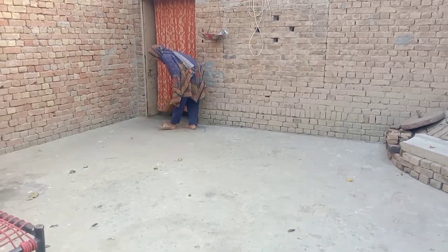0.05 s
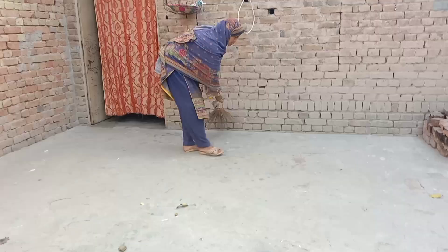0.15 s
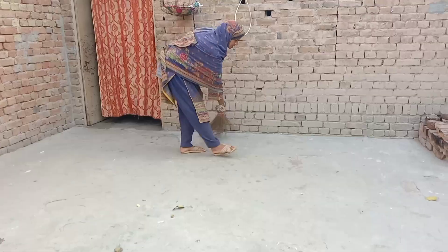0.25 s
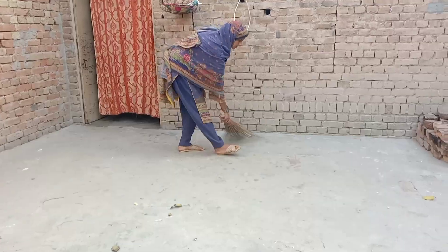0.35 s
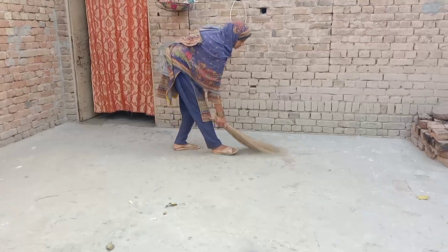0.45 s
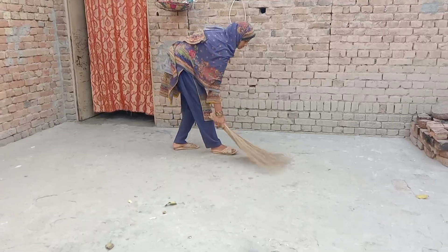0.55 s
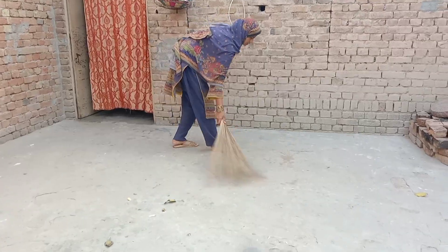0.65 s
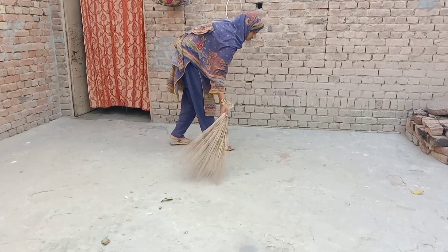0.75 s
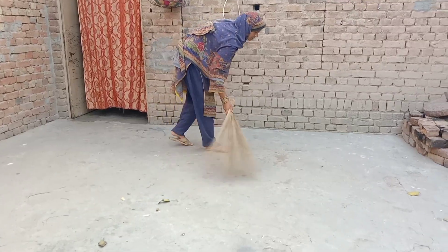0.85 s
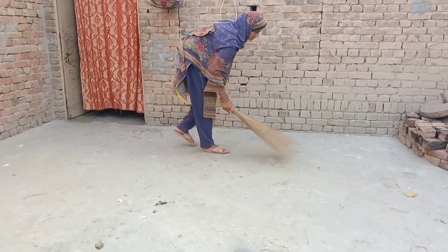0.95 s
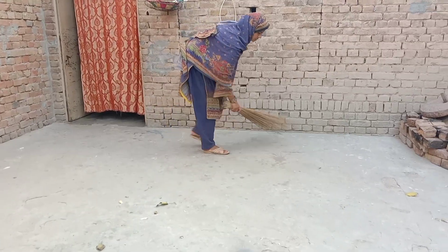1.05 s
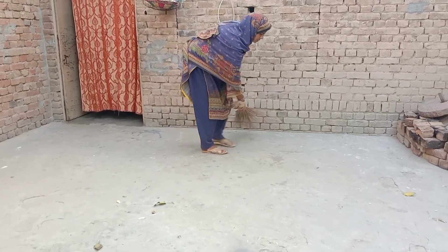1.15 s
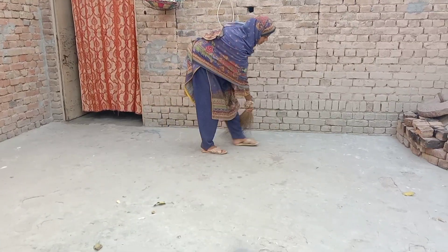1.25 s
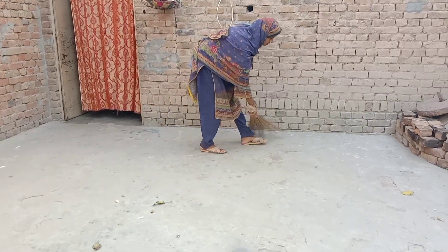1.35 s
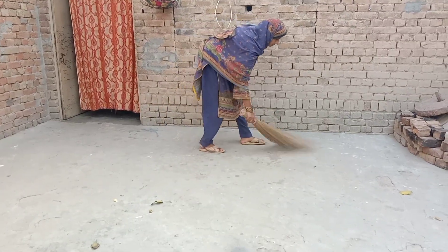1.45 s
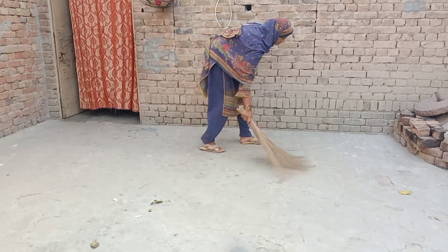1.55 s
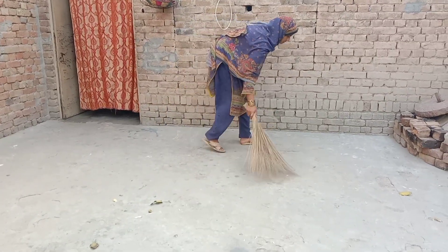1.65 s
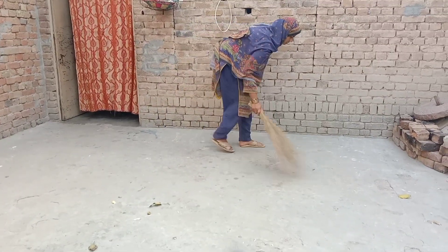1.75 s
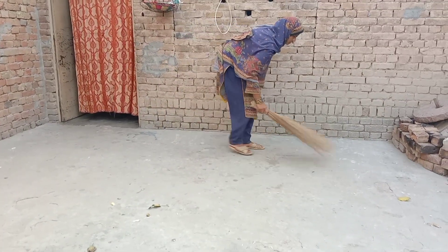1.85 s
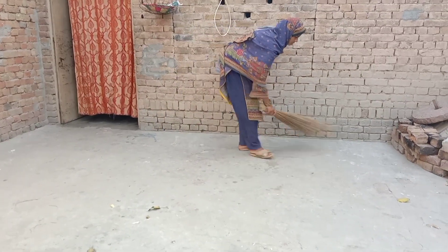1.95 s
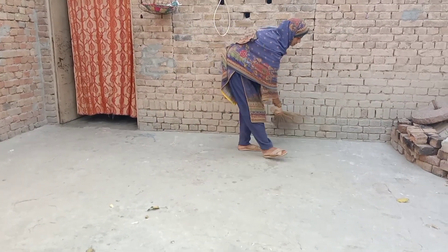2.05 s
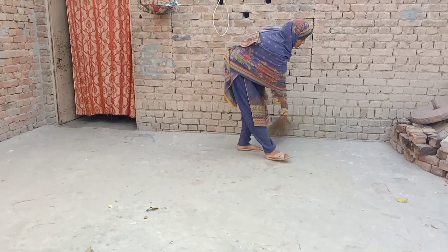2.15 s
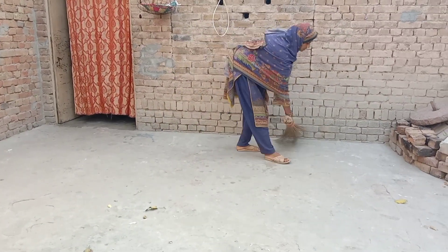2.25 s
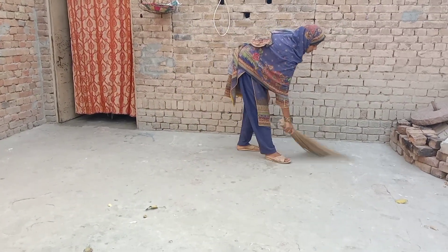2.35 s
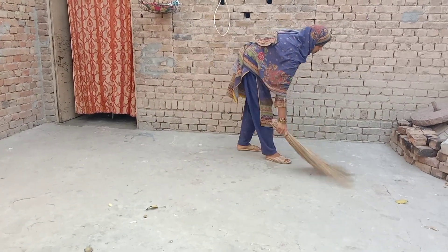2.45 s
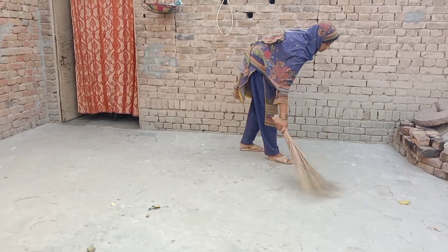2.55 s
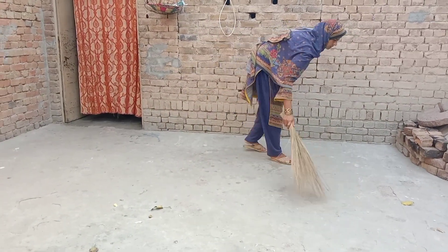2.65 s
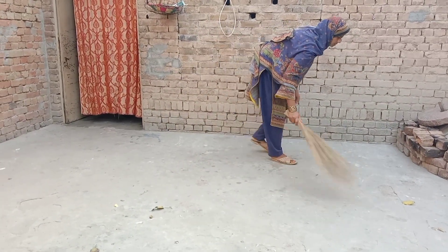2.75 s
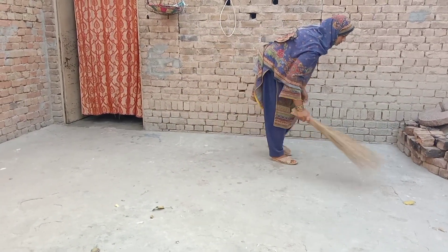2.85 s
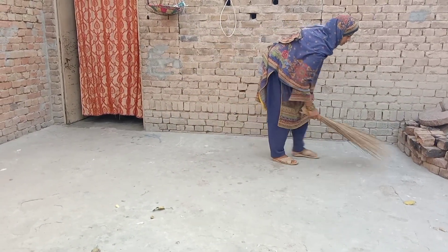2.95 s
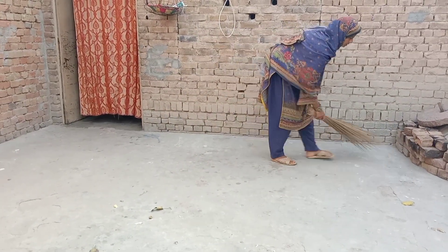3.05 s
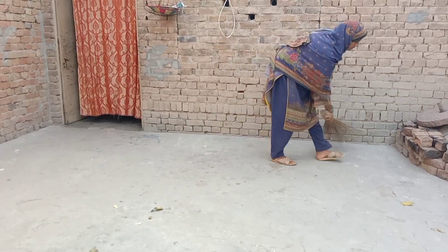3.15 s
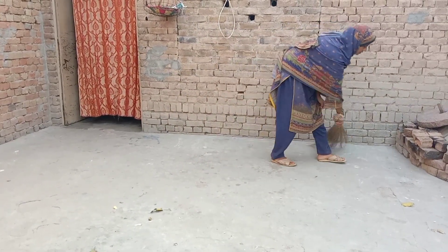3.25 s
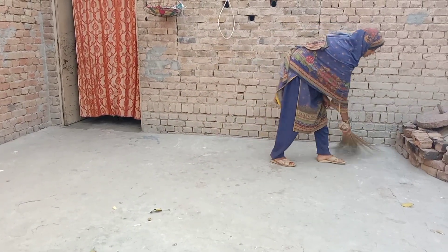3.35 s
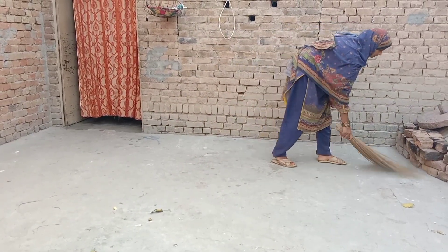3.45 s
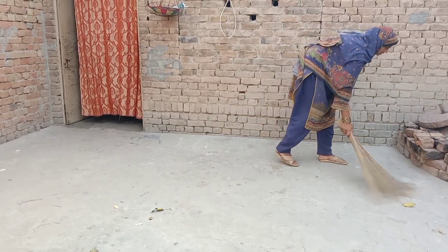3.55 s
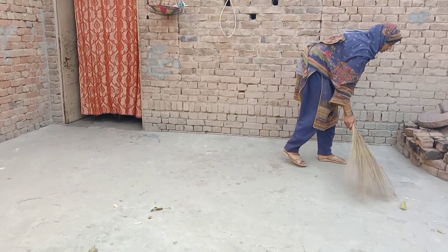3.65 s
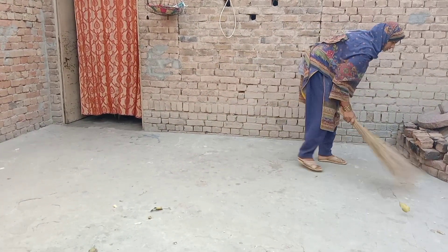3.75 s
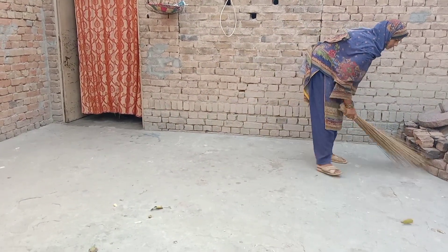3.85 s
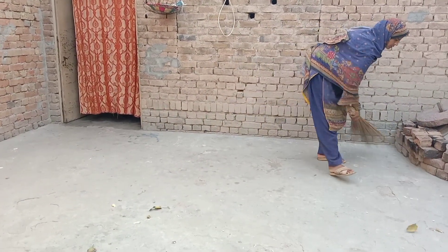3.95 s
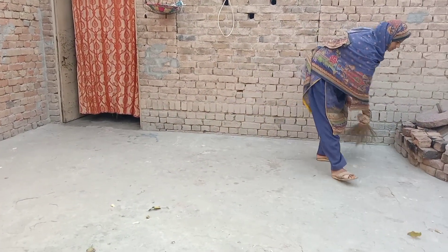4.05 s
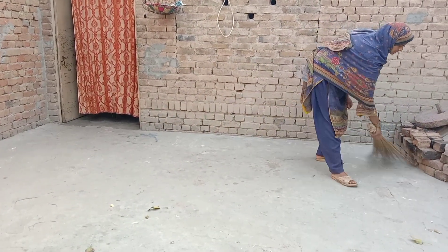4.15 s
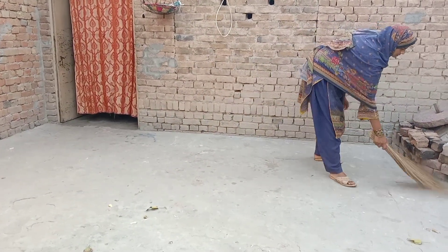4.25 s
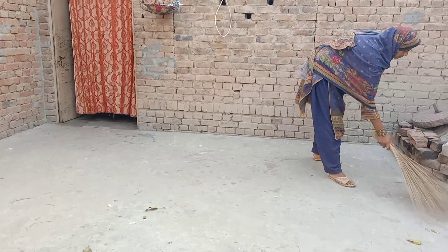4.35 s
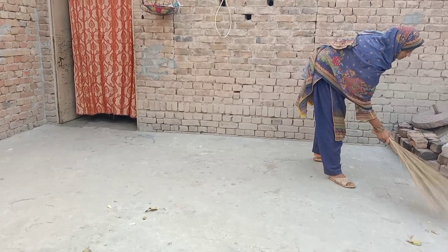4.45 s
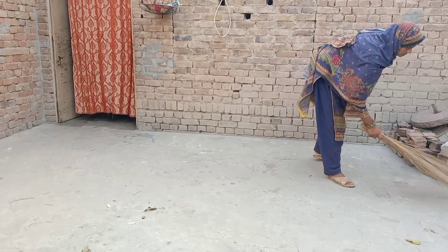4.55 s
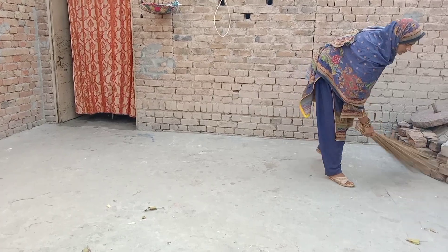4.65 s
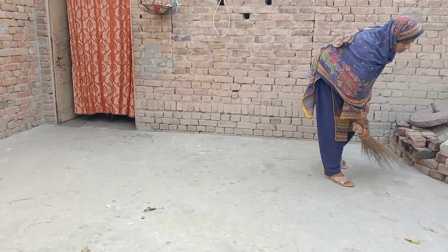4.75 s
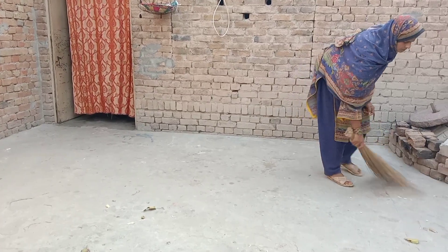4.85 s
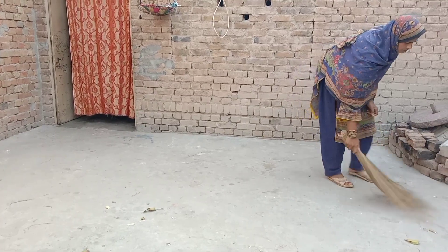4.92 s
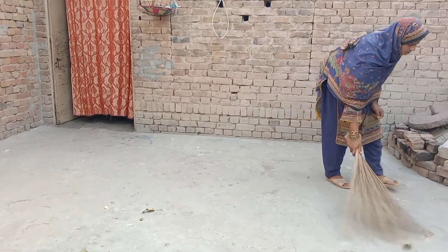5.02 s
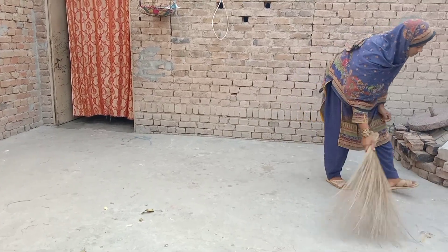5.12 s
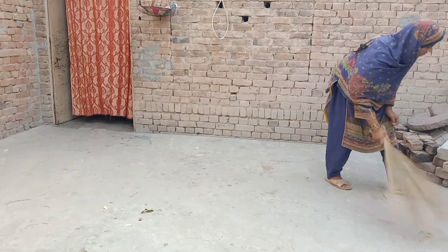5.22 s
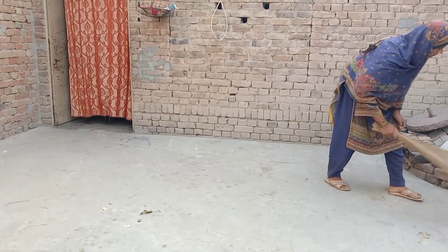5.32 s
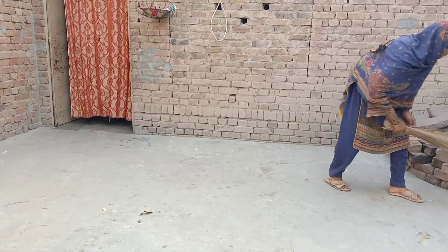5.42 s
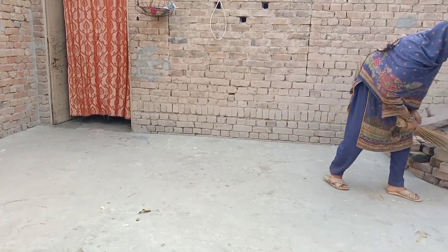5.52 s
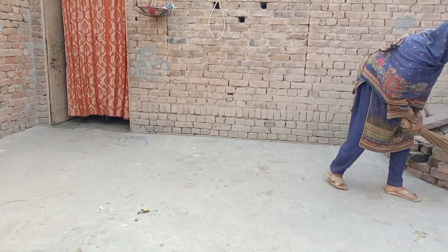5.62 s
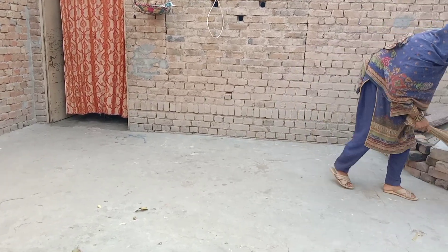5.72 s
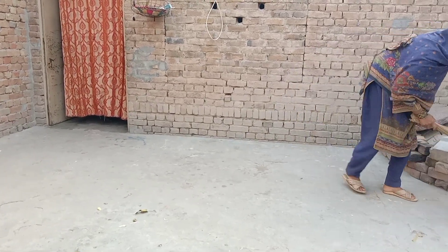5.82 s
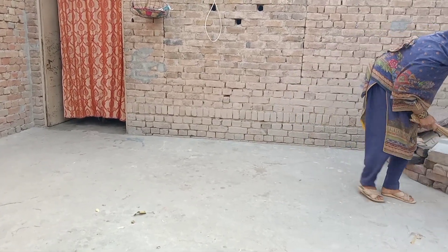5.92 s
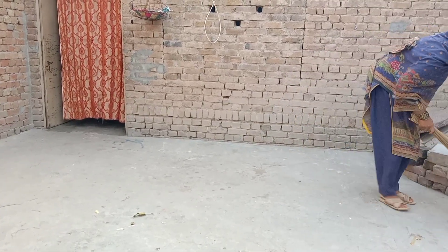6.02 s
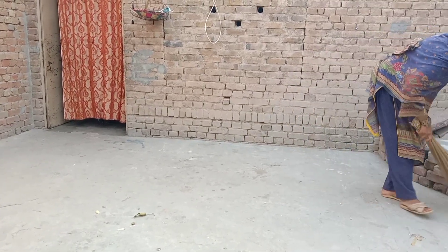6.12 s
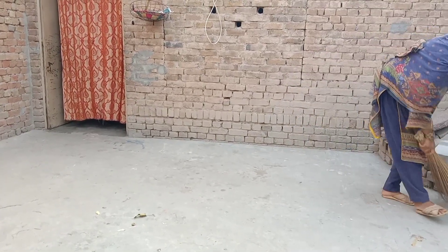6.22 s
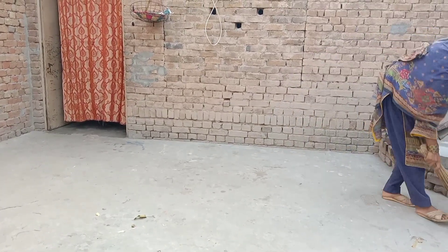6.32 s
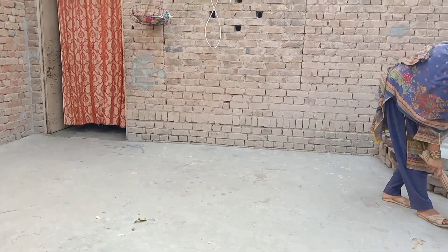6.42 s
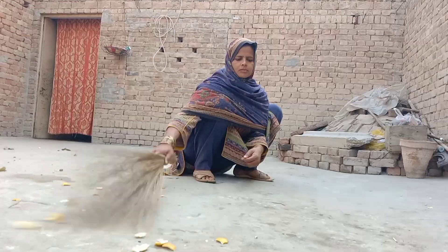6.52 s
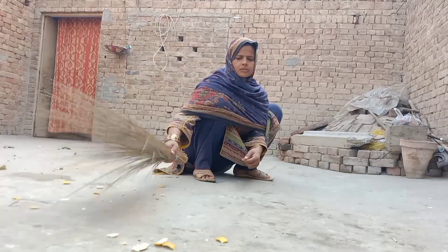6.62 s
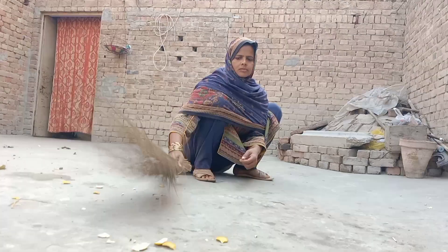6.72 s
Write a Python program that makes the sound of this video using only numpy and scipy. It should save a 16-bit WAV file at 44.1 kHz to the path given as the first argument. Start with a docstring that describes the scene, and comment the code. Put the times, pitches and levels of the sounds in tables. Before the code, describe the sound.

A dry grass broom sweeps gritty concrete in eight bright swishing strokes, then a louder ninth starts, over a faint low hum and distant birds.

```python
"""A concrete courtyard with brick walls: a grass broom sweeps eight long strokes, and a ninth begins.
Broom: crowds of tiny clicks, dry stems slipping on grit, shaped into hiss, low rasp and bright sheen.
Sandals: short bands of noise scuff, and fading ones tap. The walls add scattered echoes.
Birds: gliding whistles roughened by noise; the far hoots are short tones with overtones.
Far off, two wavering low tones hum over rumbling noise and soft open air."""
import sys
import numpy as np
from scipy import signal
from scipy.fft import rfft, irfft
from scipy.io import wavfile

SR = 44100
rng = np.random.default_rng(int(sys.argv[2]) if len(sys.argv) > 2 else 0)


def int16_out(signal):
    """Quantize to a 16-bit WAV file."""
    q = np.round(np.clip(np.atleast_2d(signal).T, -1, 1) * 32767)
    wavfile.write(sys.argv[1], SR, q.astype(np.int16))


N = 298998
TIME = np.arange(N) / SR

# overall colour of the dry stems: pitch_hz [Hz], relative_level_db [dB]
STEM_COLOUR = [(350, -62), (600, -42), (726, -41.5), (966, -41), (1580, -17.5), (2790, -13.5), (3290, -9),
               (4090, -12.5), (4750, -7), (5660, -1.5), (6400, -1), (8070, -12), (9370, -13.5), (14700, -1),
               (15500, 0.5)]
# the tips slap down after a moment in the air: start_s [s], level_db [dB], fade_by_60_db_s [s]
LANDINGS = [(.133, -28, .1), (1.155, -47, 0.18), (2.05, -40, .12), (2.945, -47, 0.13),
            (6.737, -21.5, 0.085)]


def broom():
    """Fine and coarse slips under the stroke; pressure brings out the rasp, speed the sheen."""
    # narrow colours of the hiss: pitch_hz [Hz], width_hz [Hz], boost_db [dB]
    stem_peaks = [(1632, 110, 6), (3284, 180, 3.5), (4100, 290, -2), (6160, 240, -2), (11470, 220, -2),
                  (11700, 200, 2), (12800, 180, 2), (14650, 320, 2.5)]
    fine = slips(per_s=26000, spread_db=-1.0)
    coarse = slips(per_s=1500, spread_db=1.5)
    friction = near_walls(fine + gain_of(-10.0) * coarse)
    # tufts of stems catch and let go together
    catching = gain_of(0.54 * wander(rate_hz=240) + 0.64 * wander(rate_hz=14))
    drive = yard(friction * catching * gain_of(contact(TIME)[0]), wet_db=-17)
    # cut the sound into short overlapping frames, to colour each one by itself
    hz, t, z = signal.stft(drive, SR, nperseg=512, noverlap=384)

    peaks_db = sum(db * np.exp(-((hz - f) / width) ** 2) for f, width, db in stem_peaks)
    colour_db = read(STEM_COLOUR, hz) + peaks_db
    # how strong this colour already is in each of the three bands
    power = gain_of(colour_db) ** 2 / len(hz)
    bands_hz = [(4500, 8000), (1400, 2500), (10000, 15500)]
    hiss, rasp, sheen = (10 * np.log10(power[(hz > lo) & (hz < hi)].sum()) for lo, hi in bands_hz)

    # tilt the lows and highs so that rasp and sheen follow the stroke
    level_db, rasp_db, sheen_db = contact(t)
    low_share = read([(2000, 1.0), (4600, 0.019)], hz)[:, None]
    high_share = read([(6600, 0.11), (8800, 1.0), (13000, 1)], hz)[:, None]
    low_tilt_db = low_share * (rasp_db - rasp + hiss)
    high_tilt_db = high_share * (sheen_db - sheen + hiss + 0.52)
    # a hard push brings out the thick stalks, a light one holds them back
    stalk_share = read([(650, 0.0), (1000, 0.49), (1600, 0.0)], hz)[:, None]
    stalks_db = stalk_share * np.clip(level_db + 32.5, -15, 5)
    # as the broom travels, reflections off floor and walls shift: narrow bands of the hiss swell and fade
    depth_db = read([(1000, 2.8), (3000, 1.5), (6000, .8), (15000, .5)], hz)[:, None]
    shifting_db = depth_db * patches(z.shape, width_hz=290, last_s=0.15)
    shifting_db = shifting_db + 0.8 * patches(z.shape, width_hz=730, last_s=0.04)
    # a light touch has few stems down, so its colour is more uneven
    lightness = np.interp(level_db, [-45, -27], [1.8, 1])

    total_db = colour_db[:, None] - hiss + low_tilt_db + high_tilt_db
    total_db = total_db + stalks_db + lightness * shifting_db
    swept = signal.istft(z * gain_of(total_db), SR, nperseg=512, noverlap=384)[1][:N]
    return gain_of(-0.55) * swept


def swing(t, s, held, db, press_db_per_s, lift_db_per_s, rasp_db, sheen_db):
    """The broom presses down, arches through its swing and lifts: levels of hiss, rasp and sheen in dB."""
    arch_db = 4  # a swing is this much louder in its middle than at its ends
    dulling_db = 1.04  # as the stems bend over, the sheen falls by this much per half swing
    rasp_follows, sheen_follows = 0.91, 1.066  # dB per dB of hiss: the rasp lingers, the sheen needs speed
    along = np.clip(2 * (t - s) / held - 1, -1, 1)  # -1 at the start of the swing, 1 at its end
    pressing_db = press_db_per_s * np.maximum(s - t, 0)
    lifting_db = lift_db_per_s * np.maximum(t - s - held, 0)
    below = arch_db * along ** 2 + pressing_db + lifting_db
    rasp = rasp_db - rasp_follows * below
    sheen = sheen_db - sheen_follows * below - dulling_db * along
    return db + np.array([-below, rasp, sheen])


def contact(t):
    """All pushes and drags together: the hiss in dB, and rasp and sheen against it."""
    # the broom pushed across the floor: full_contact_s [s], held_s [s], hiss_db [dB],
    # press_db_per_s [dB/s], lift_db_per_s [dB/s], rasp_db, sheen_db [dB against the hiss]
    strokes = [(0.329, 0.37, -22.5, 185, 121, -20, 5), (1.337, 0.347, -22, 194, 204, -21, 2.5),
               (2.268, 0.36, -22.5, 121, 156, -19.5, 2.5), (3.332, 0.29, -21.5, 188, 166, -18.5, 2),
               (4.163, 0.22, -22, 310.0, 148, -17, 2), (4.872, 0.22, -21, 276, 134, -18.7, 0.6),
               (5.564, 0.26, -32.5, 190, 147, -15.5, 1.5), (6.31, 0.16, -22, 127, 134, -25, -1.1),
               (6.75, 0.48, -15.5, 750.0, 160.0, -32, -2.5)]
    # the tips trail lightly before or after a push: start_s [s], held_s [s], hiss_db [dB],
    # rasp_db, sheen_db [dB against the hiss]
    light_drags = [(0.144, 0.12, -34.5, -15.9, 3.5), (0.821, 0.12, -35.5, -27, 1.5),
                   (1.189, 0.097, -47, -36, 4), (1.796, 0.118, -48.8, -33, 1.5),
                   (2.078, 0.13, -33.5, -18.4, 3.5), (2.949, 0.061, -51.5, -13, -1),
                   (3.159, 0.12, -42, -11.8, -0.5), (3.816, 0.156, -41.5, -20.5, -1),
                   (4.631, 0.13, -46, -15.5, 0.5), (5.223, 0.11, -42.5, -13.9, -7.1),
                   (6.189, 0.23, -31, -12, 0.5), (6.626, 0.23, -43.5, -24, -0.5)]
    # the stems catch and grip harder for a moment: middle_s [s], width_s [s], extra_db [dB]
    grips = [(1.32, 0.015, 1.5), (2.385, 0.023, 2), (4.205, .02, 0.5), (5.7, .03, 1.5), (6.395, 0.018, 3)]
    drag_press_db_per_s, drag_lift_db_per_s = 532, 265
    airborne_s, airborne_db, touch_s = 0.078, -10.5, 0.0068  # the level dips before each landing
    rest_db = -77.5  # faint hiss with the broom in the air

    drags = [(s, held, db, drag_press_db_per_s, drag_lift_db_per_s, rasp, sheen)
             for s, held, db, rasp, sheen in light_drags]
    power = sum(gain_of(swing(t, *row)) ** 2 for row in list(strokes) + drags)
    lifted = sum(np.interp(t - s, [-airborne_s, 0, touch_s], [0, 1, 0]) for s, _, _ in LANDINGS)
    rest_power = gain_of(rest_db + np.array([[0], [-12], [-8]])) ** 2
    hiss, rasp, sheen = 10 * np.log10(power * gain_of(airborne_db * lifted) ** 2 + rest_power)
    # a grip raises hiss and sheen, but leaves the rasp where it was
    grip_db = sum(db * np.exp(-((t - s) / width) ** 2) for s, width, db in grips)
    return hiss + grip_db, rasp - hiss - grip_db, sheen - hiss


def tips():
    """Single stems tick as the broom moves, clearest when it barely touches; a landing spatters many."""
    level_db = contact(TIME)[0]
    # the ticks stop growing once the push is firm
    ticks = slips(per_s=240, spread_db=5) * gain_of(np.minimum(level_db - 11, -35))
    spatter = slips(per_s=5400, spread_db=4)
    for s, db, t60 in LANDINGS:
        t = np.arange(0, t60, 1 / SR)
        add(ticks, s, gain_of(db - 60 * t / t60) * spatter[:len(t)])
    # the fine tips are brighter than the stems: pitch_hz [Hz], change_db [dB]
    tip_tilt = [(1500, -5.5), (5000, -2), (11000, 3), (15000, 2)]
    hz = np.fft.rfftfreq(N, 1 / SR)
    colour = evened(gain_of(read(STEM_COLOUR, hz) + read(tip_tilt, hz)))
    return yard(irfft(rfft(ticks) * colour, N), wet_db=-10)


def feet():
    """Soles drag over the grit as bands of noise, and tap with a short dull ring."""
    # sandal scuffs and low scrapes: start_s [s], length_s [s], level_db [dB], centre_hz [Hz],
    # width_octaves [octaves to each side]
    scuffs = [(0.07, 0.08, -53.5, 1390, 0.44), (1.234, .1, -56.5, 1000, 0.23),
              (4.19, 0.15, -54.5, 1000, 0.14), (6.192, 0.095, -58, 976, 0.18),
              (6.333, 0.13, -52.5, 1100, 0.54), (6.725, 0.12, -45, 1210, 0.47)]
    # taps of sandals and grit: start_s [s], relative_level_db [dB], ring_hz [Hz], fade_by_60_db_s [s]
    sandal_taps = [(.079, -41, 1300, .06), (.932, -20, 5540, 0.024), (1.806, -37, 2480, 0.06),
                   (3.865, -34, 3300, 0.21), (3.917, -26.5, 4170, 0.042), (4.075, -44, 2400, 0.066),
                   (4.448, -29.5, 1870, 0.083), (5.297, -20, 6040, 0.033), (6.019, -35.5, 1750, 0.042),
                   (6.667, -36, 1340, 0.035), (6.708, -42, 1260, 0.088)]
    # colour of a sliding sole: pitch_hz [Hz], relative_level_db [dB]
    sole_colour = [(500, -50), (900, -9), (1900, -9.5), (3000, 0.5), (4200, -5.5), (5700, 4), (8500, -12.5),
                   (13000, -15)]
    slide_s, slide_length_s, slide_db = 3.012, 0.1, -32  # one sole slides a whole step
    out = np.zeros(N)
    for s, length, db, hz, octaves in scuffs:
        t = np.arange(0, length, 1 / SR)
        add(out, s, gain_of(db) * rub(t, hz, octaves) * signal.windows.tukey(len(t), .7))
    size = int(slide_length_s * SR)
    add(out, slide_s, gain_of(slide_db) * noise(sole_colour)[:size] * signal.windows.tukey(size, .7))
    t = np.arange(SR // 5) / SR
    onset = 0.45 * (1 - np.exp(-t / 0.0011))  # softens the first millisecond
    for s, db, hz, t60 in sandal_taps:
        add(out, s, gain_of(db - 60 * t / t60) * rub(t, hz, octaves=0.17) * onset)
    return yard(out, wet_db=-8.5)


def birds():
    """Hoarse chirps: a gliding whistle carries a band of rasp, smeared by the walls."""
    # bird chirps: start_s [s], length_s [s], start_hz [Hz], end_hz [Hz], relative_level_db [dB]
    chirps = [(1, 0.042, 4680, 3300, -60), (1.04, 0.064, 3180, 2870, -56.5),
              (2.753, 0.076, 2540, 3130, -48.5), (2.959, 0.067, 3180, 3650, -47.5),
              (4.018, .06, 5240, 5650, -43), (4.028, 0.11, 2206, 2530, -47),
              (4.508, 0.067, 1810, 2250, -48.5), (4.579, 0.072, 3310, 2690, -42.5),
              (4.66, 0.081, 2180, 1905, -47.5), (5.227, 0.0485, 2455, 3090, -41.5),
              (5.327, 0.064, 4840, 3830, -50), (5.399, 0.056, 3320, 2850, -52),
              (5.926, 0.091, 6280, 4720, -42), (6.59, 0.038, 4000, 3350, -45)]
    out, rasp, waver = np.zeros(N), wander(rate_hz=390), wander(rate_hz=77)
    for s, length, start_hz, end_hz, db in chirps:
        span = slice(int(s * SR), int((s + length) * SR))
        size = span.stop - span.start
        hz = np.geomspace(start_hz, end_hz, size) * (1 + 0.0314 * waver[span])
        whistle = np.sin(2 * np.pi * np.cumsum(hz) / SR)
        voice = (.7 + .7 * rasp[span]) * whistle
        add(out, s, gain_of(db) * voice * signal.windows.tukey(size, .6))
    return yard(out, wet_db=0.0)


def hoots():
    """Short, nearly level far tones with faint overtones; a few have a nasal edge."""
    # faint far hoots: start_s [s], length_s [s], pitch_hz [Hz], level_db [dB],
    # overtones_db [dB, for the whole set of overtones]
    far_hoots = [(0.084, 0.052, 411, -56.5, -1), (1.98, 0.2, 617, -62.5, -32),
                 (2.114, 0.082, 600, -55, -30), (3.465, 0.1, 605, -59, -30), (3.7, 0.062, 337, -51.5, -27),
                 (3.775, 0.13, 692, -67, -32), (5.7, 0.09, 610, -58, -30), (6.628, 0.12, 434, -55, -17)]
    out, waver = np.zeros(N), wander(rate_hz=73)
    for s, length, hz, db, overtones_db in far_hoots:
        n = int(length * SR)
        wavering_hz = hz * (1 + .014 * waver[int(s * SR):][:n])
        phase = 2 * np.pi * np.cumsum(wavering_hz) / SR
        overtones = .7 * np.sin(2 * phase) + 1.6 * np.sin(3 * phase) + np.sin(4 * phase)
        tone = np.sin(phase) + gain_of(overtones_db) * overtones
        add(out, s, gain_of(db) * tone * signal.windows.tukey(n, .5))
    return yard(out, wet_db=-17)


def hum():
    """Two wavering low tones beat over a surging rumble and the open air."""
    # the two tones: pitch_hz [Hz], relative_level_db [dB]
    hum_lines = [(162.6, 2), (136.2, -0.5)]
    # colours of the rumble, the hollow upper part and the air: pitch_hz [Hz], relative_level_db [dB]
    rumble_colour = [(12, -59), (20, -23), (32, -25), (43, -27.5), (72, -5.5), (103, -2.5), (150, 0),
                     (168, -1.5), (199, -12.5), (230, -18), (300, -47), (510, -120)]
    upper_colour = [(150, -22), (210, -4.5), (265, 1), (300, 6.5), (335, 4.5), (370, -4), (410, -13),
                    (460, -37), (700, -58)]
    air_colour = [(20, 11.5), (200, 5), (450, 7.5), (900, 3), (1500, 7), (2300, -14), (6000, -11),
                  (9000, -24), (16000, -26)]
    # slow levels of the tones, the rumble and the upper part: time_s [s], relative_level_db [dB]
    drone_curve = [(0.16, -50), (0.64, -55), (0.73, -46), (1.12, -56), (1.5, -47.5), (1.79, -59.5),
                   (2.27, -43), (2.75, -45), (2.94, -61.5), (3.32, -43), (3.42, -52.5), (5.05, -59.5),
                   (5.14, -47), (5.62, -46), (6.0, -49.5), (6.77, -50)]
    rumble_curve = [(0.16, -57), (0.73, -60), (0.93, -59), (3.029, -62), (4.47, -63.0), (4.66, -67.5),
                    (5.72, -56.0), (6.2, -70), (6.48, -52), (6.77, -58.5)]
    upper_curve = [(0.16, -72), (0.83, -57.5), (1.88, -55), (1.98, -71), (2.17, -56.5), (2.36, -76),
                   (2.55, -57.5), (2.84, -74.5), (3.7, -60.5), (3.9, -68), (5.72, -73), (6.1, -82.5),
                   (6.58, -57.5), (6.77, -65)]
    drone_db = follow(drone_curve, TIME)[0]
    rumble_db = follow(rumble_curve, TIME)[0]
    upper_db = follow(upper_curve, TIME)[0]

    drone = np.zeros(N)
    for hz, db in hum_lines:
        level = gain_of(db + 2.7 * wander(rate_hz=2.3))
        wavering_hz = hz + 3 * wander(rate_hz=8.2)
        drone += level * np.sin(2 * np.pi * np.cumsum(wavering_hz) / SR)
    rumble = gain_of(rumble_db + 5.5 + 3.7 * wander(rate_hz=9.1)) * noise(rumble_colour)
    upper = gain_of(upper_db - 1.5 + 5 * wander(rate_hz=9.2)) * noise(upper_colour)
    air = gain_of(-70.5) * uneven(noise(air_colour), depth_db=5.5, width_hz=250, last_s=.15)
    # the hum is almost absent before 0.128 s, and the air softer
    present = np.clip((TIME - .128) / 0.0028, .04, 1)
    low = gain_of(drone_db - 2) * evened(drone) + rumble + upper
    return present * low + air * np.maximum(present, .6)


def yard(x, wet_db):
    """Adds the scattered echoes of the brick walls, fading at a different speed for each pitch."""
    # how long echoes last: pitch_hz [Hz], fade_by_60_db_s [s]
    echo_times = [(200, 0.9), (2000, 0.23), (6000, 0.44), (15000, 0.31)]
    t = np.arange(SR // 2) / SR
    scattered = rng.random(len(t)) < .08
    echoes = rng.standard_normal(len(t)) * scattered * (t > .006)
    hz, s, z = signal.stft(echoes, SR, nperseg=256)
    fade = gain_of(-60 * s / read(echo_times, hz)[:, None])
    tail = signal.istft(z * fade, SR, nperseg=256)[1]
    return x + gain_of(wet_db) * signal.fftconvolve(x, tail / np.linalg.norm(tail))[:N]


def near_walls(x, count=7):
    """The floor and the nearest bricks return the sound within a few milliseconds."""
    out = x.copy()
    for delay_s, sign in zip(rng.uniform(.0004, .009, count), rng.choice([-1, 1], count)):
        add(out, delay_s, sign * .09 * x)
    return evened(out)


def slips(per_s, spread_db):
    """Tiny clicks of stems slipping off grains of concrete, at random moments and of random size."""
    size = gain_of(spread_db * np.minimum(rng.exponential(1, N), 4))
    return evened(size * rng.choice([-1, 1], N) * (rng.random(N) < per_s / SR))


def rub(t, hz, octaves):
    """A short stretch of noise around one frequency."""
    away = np.log2((np.fft.rfftfreq(SR, 1 / SR) + 1) / hz) / octaves
    return evened(irfft(rfft(rng.standard_normal(SR)) / (1 + away ** 6), SR))[:len(t)]


def noise(points):
    """Steady noise with a given spectrum."""
    colour = gain_of(read(points, np.fft.rfftfreq(N, 1 / SR)))
    return evened(irfft(rfft(rng.standard_normal(N)) * colour, N))


def uneven(x, depth_db, width_hz, last_s):
    """Lets neighbouring bands of a noise swell and fade apart."""
    z = signal.stft(x, SR, nperseg=512, noverlap=384)[2]
    z = z * gain_of(depth_db * patches(z.shape, width_hz, last_s))
    return evened(signal.istft(z, SR, nperseg=512, noverlap=384)[1][:N])


def patches(shape, width_hz, last_s):
    """A smooth random field over frequency and time, for frames of 512 samples, 128 apart."""
    across = np.fft.fftfreq(shape[0], SR / 512)[:, None] * width_hz
    along = np.fft.fftfreq(shape[1], 128 / SR) * last_s
    smoothing = np.exp(-across ** 2 - along ** 2)
    return evened(np.fft.ifft2(np.fft.fft2(rng.standard_normal(shape)) * smoothing).real)


def wander(rate_hz):
    """A smooth random curve that drifts at about the given rate and slower."""
    t = np.linspace(0, N / SR, 16384)
    smoothing = np.exp(-(np.fft.rfftfreq(len(t), t[1]) / rate_hz) ** 2)
    slow = irfft(rfft(rng.standard_normal(len(t))) * smoothing)
    return np.interp(TIME, t, evened(slow))


def gain_of(db):
    """Decibels to amplitude."""
    return 10 ** (np.asarray(db) / 20)


def evened(x):
    """Scales to an rms (average strength) of one."""
    return x / np.sqrt(np.mean(x ** 2) + 1e-20)


def read(points, hz):
    """Reads a spectrum on a log-frequency axis."""
    f, value = np.transpose(points)
    return np.interp(np.log(hz + 1), np.log(f + 1), value)


def follow(rows, t):
    """Reads every column of a curve at the times t."""
    s, *columns = np.transpose(rows)
    return [np.interp(t, s, column) for column in columns]


def add(mix, s, sound):
    """Mixes a sound in at second s."""
    part = mix[max(round(s * SR), 0):][:len(sound)]
    part += sound[:len(part)]


def scene():
    """Everything is heard in the middle."""
    middle = broom() + tips() + feet() + birds() + hoots() + hum()
    return np.array([middle, middle])


def record(dry):
    """A steep low-pass filter takes away the very highest treble, above about 15600 Hz."""
    low_pass = signal.firwin(601, 15600, window=("kaiser", 9), fs=SR)
    return signal.oaconvolve(dry, low_pass[None], "same")


dry = scene()
out = record(dry)
int16_out(out)
```